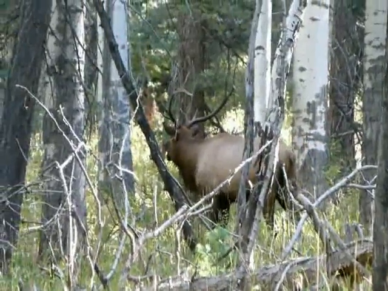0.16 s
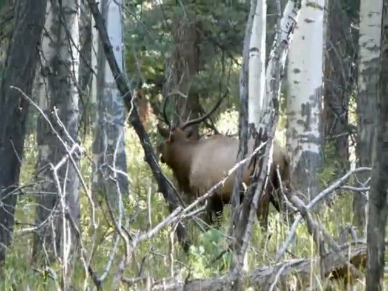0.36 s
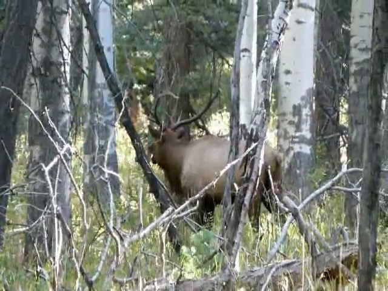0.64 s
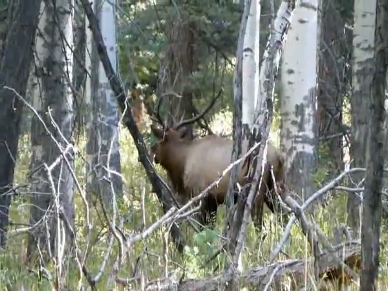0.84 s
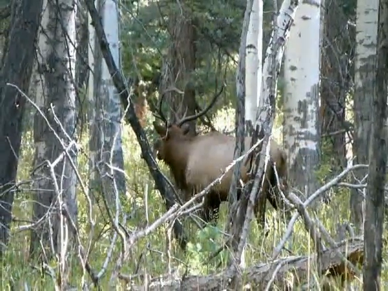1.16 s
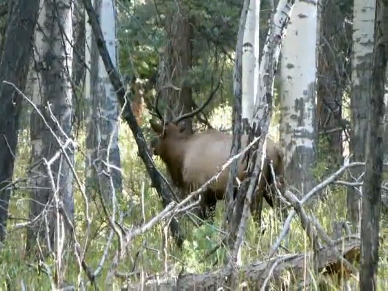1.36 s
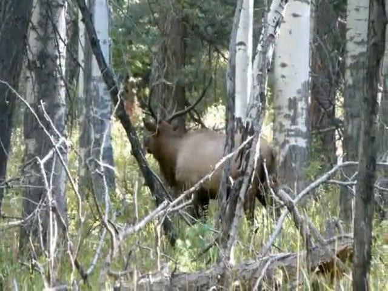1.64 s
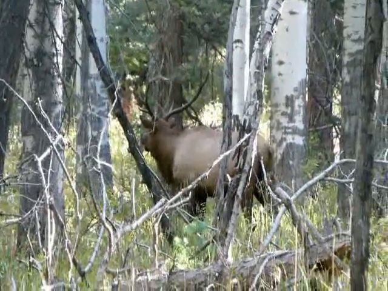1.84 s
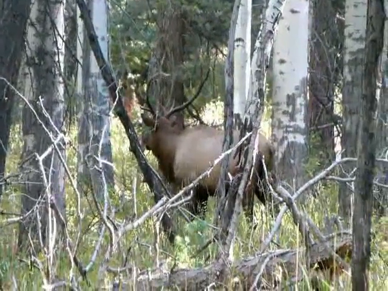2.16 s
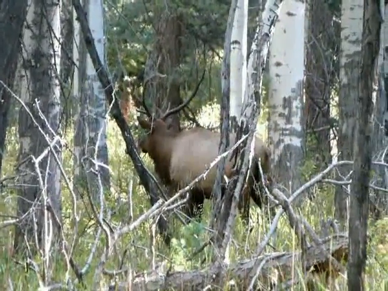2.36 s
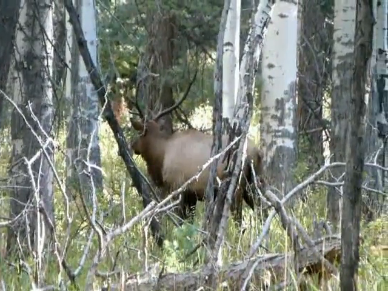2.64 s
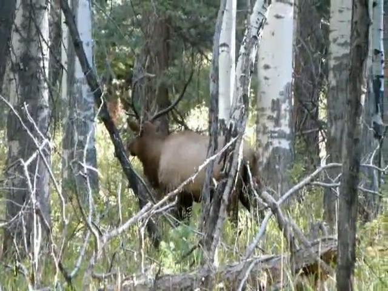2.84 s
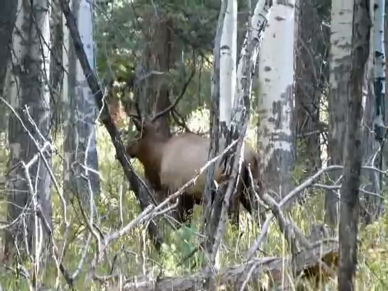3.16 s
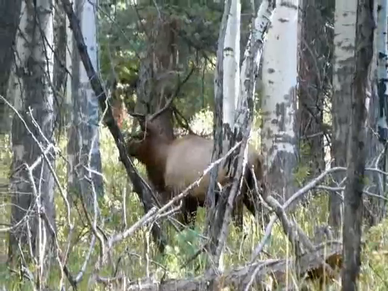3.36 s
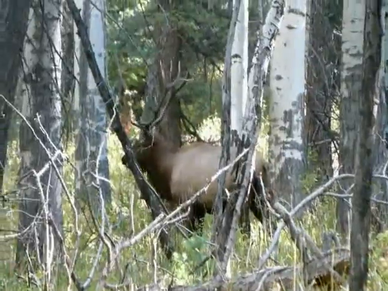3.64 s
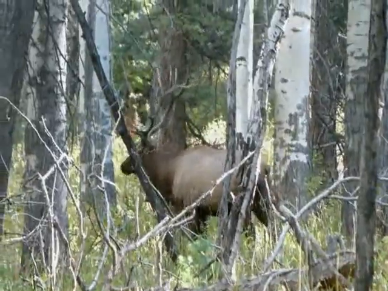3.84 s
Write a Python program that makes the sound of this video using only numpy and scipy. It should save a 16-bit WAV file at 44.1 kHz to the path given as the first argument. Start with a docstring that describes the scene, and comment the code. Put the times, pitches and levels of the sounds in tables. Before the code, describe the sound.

An elk's high, whistling bugle drops to a grunt and echoes, before two faint bird notes.

```python
"""A high whistle glides up in a forest: a bull elk bugling. It holds among rough, beating side tones,
then falls through the throat's resonances into a hoarse grunt of ragged pulses and breath.
The trees echo it for a second or more. A brief rustle and two nasal bird notes, perhaps a nuthatch,
follow over quiet air, a low hum and a faint burble with dull knocks."""
import sys
import numpy as np
from scipy import signal
from scipy.fft import rfft, irfft, next_fast_len
from scipy.io import wavfile
from scipy.ndimage import uniform_filter1d, map_coordinates

SR = 44100
rng = np.random.default_rng(int(sys.argv[2]) if len(sys.argv) > 2 else 0)


def put_to_file(sound):
    """Save the sound as 16-bit audio at rate SR, in the file named by the first command-line argument."""
    columns = np.atleast_2d(sound).T  # one column per channel
    safe = np.clip(columns, -1, 1)
    whole_steps = np.round(safe * 32767)
    wavfile.write(sys.argv[1], SR, whole_steps.astype(np.int16))


N = 176400

# Rise and hold of the main whistle: t/s, f/Hz
WHISTLE_GLIDE = [(0, 1835), (.12, 1918), (.29, 1992), (.345, 2059), (.69, 2073), (.76, 2090), (.85, 2080),
                 (1.17, 2072), (1.24, 2057), (1.3, 2071)]
# Swells of its fundamental, octave and third partial: t/s, level/dB
WHISTLE_SWELLS = [(0, -43.5), (.13, -43), (.27, -29.5), (.38, -29), (.46, -35), (.5, -26), (.57, -21.5),
                  (.635, -38.5), (.68, -24.5), (.735, -34), (.8, -26), (.87, -26), (.95, -41), (1.04, -24),
                  (1.11, -33), (1.15, -25.5), (1.215, -27.5), (1.255, -40), (1.28, -26.5), (1.37, -28.5),
                  (1.45, -44.5)]
OCTAVE_SWELLS = [(0, -64), (.27, -59), (.36, -49), (.47, -54), (.54, -38.5), (.59, -52), (.668, -39),
                 (.708, -52.5), (.75, -36.5), (.798, -55), (.862, -37), (.906, -59.5), (.946, -43),
                 (1.038, -39.5), (1.086, -56), (1.17, -39.5), (1.4, -61)]
THIRD_SWELLS = [(.3, -83), (.38, -69.5), (.64, -60.5), (.8, -67), (.87, -63), (1.0, -70.5), (1.19, -67.5),
                (1.32, -91.5)]

def whistle():
    """The lead: a clean, loud tone with two overtones, whose pitch tremble eases as it settles."""
    hz, = curves(WHISTLE_GLIDE)
    db, octave_db, third_db = curves(WHISTLE_SWELLS) + curves(OCTAVE_SWELLS) + curves(THIRD_SWELLS)
    settle_s = 0.42
    unsettled = np.clip(1 - np.arange(N) / SR / settle_s, 0, 1)
    phase = phase_of(hz, jitter=.001 + .011 * unsettled, rate=180)
    octave = amp(octave_db) * np.sin(2 * phase)
    third = amp(third_db + 3 * wobble(22)) * np.sin(3 * phase)
    fundamental = amp(db + 0.85 * wobble(86)) * np.sin(phase)
    return np.sqrt(2) * during(WHISTLE_SWELLS) * (fundamental + octave + third)


# Rougher whistle just above the lead: t/s, f/Hz, level/dB, octave level/dB
SHAKY_WHISTLE = [(0, 2247, -43.5, -78), (.28, 2203, -41, -60.5), (.5, 2193, -44.5, -69.5),
                 (.7, 2188, -45, -72), (.735, 2172, -41.5, -53.5), (.785, 2199, -32, -47.5),
                 (1.02, 2188, -43.5, -60.5), (1.12, 2192, -37, -49), (1.36, 2198, -36, -63),
                 (1.62, 2196, -48, -76)]

def second_whistle():
    """A shakier whistle that turns shrill twice at the height of the call."""
    hz, db, octave_db = curves(SHAKY_WHISTLE)
    phase = phase_of(hz, jitter=.004, rate=220)
    overtones = amp(octave_db) * (np.sin(2 * phase) + amp(-15) * np.sin(3 * phase))
    shimmer = amp(2 * wobble(60))
    return np.sqrt(2) * during(SHAKY_WHISTLE) * shimmer * (amp(db) * np.sin(phase) + overtones)


# Side tones above and below the lead: t/s, f/Hz, level/dB
JUST_ABOVE = [(.765, 2105, -43.5), (.79, 2151, -29), (.88, 2150, -28), (.96, 2133, -32),
              (1.15, 2118, -50.5)]
ABOVE = [(.07, 2420, -58.5), (.12, 2428, -35), (.19, 2425, -45.5), (.3, 2465, -35.5), (.38, 2430, -44),
         (.445, 2422, -30.5), (.485, 2440, -49.5), (.618, 2420, -36.5), (.65, 2425, -47),
         (.77, 2455, -45.5), (1.2, 2420, -46), (1.238, 2405, -39), (1.3, 2390, -53.5)]
FAR_ABOVE = [(.08, 2900, -63), (.16, 2893, -52.5), (.5, 2930, -63), (.85, 2914, -58), (1.2, 2850, -71)]
JUST_BELOW = [(0.278, 1993, -32.5), (.33, 1990, -31.5), (.6, 2030, -45.5), (1.25, 2004, -52)]
BELOW = [(0, 1778, -43), (.22, 1832, -44), (.5, 1854, -69)]
FAR_BELOW = [(.03, 1074, -62), (.4, 1075, -53), (.5, 1071, -58), (.8, 1069, -60.5)]
ONSET_TONE = [(0, 1528, -43), (.06, 1558, -43), (.15, 1554, -59.5), (.35, 1580, -57)]

def side_tones():
    """Rough tones around the whistle; the closest beat against it."""
    return (tone(JUST_ABOVE, jitter=.0047, rate=160, shimmer_db=6, partials=((1, 0), (2, -25)))
            + tone(ABOVE, jitter=.007, rate=220, shimmer_db=4)
            + tone(JUST_BELOW, jitter=.0088, rate=220, shimmer_db=3)
            + tone(BELOW, jitter=.025, rate=330, shimmer_db=3.5)
            + tone(ONSET_TONE, jitter=.012, rate=160, shimmer_db=0)
            + tone(FAR_BELOW, jitter=.0092, rate=160, shimmer_db=2)
            + tone(FAR_ABOVE, jitter=.0082, rate=300, shimmer_db=2))


# The tumbling whistle and the squeal on top: t/s, f/Hz, level/dB
FALL = [(1.25, 1758, -69), (1.28, 1720, -33), (1.32, 1700, -40), (1.35, 1570, -32), (1.378, 1531, -24.5),
        (1.385, 1200, -35), (1.4, 1115, -27.5), (1.415, 1075, -34), (1.44, 792, -56)]
THIN_SQUEAL = [(1.26, 3497, -64.5), (1.285, 3425, -55.5), (1.32, 3397, -48), (1.36, 3345, -60),
               (1.41, 3350, -68)]
# Partials of the fall: multiple of the pitch, level/dB
FALL_PARTIALS = [(1, -2), (2, -30.5)]

def whistle_break():
    """The whistle falls through the throat's resonances with a thin squeal."""
    fall = tone(FALL, jitter=.011, rate=300, shimmer_db=3.5, partials=FALL_PARTIALS)
    return fall + tone(THIN_SQUEAL, jitter=.009, rate=240, shimmer_db=3)


# Low voice sinking into the grunt: t/s, f/Hz, level/dB
VOICE_LINE = [(0, 168.4, -46.5), (.35, 179.8, -51.5), (.7, 170.9, -51.5), (1.02, 164.5, -51),
              (1.17, 159.3, -46), (1.36, 152.6, -46), (1.43, 140.3, -35), (1.54, 115.7, -35),
              (1.63, 105, -41), (1.8, 95, -56), (2.0, 89, -57)]
# Throat resonances: f/Hz, width/Hz, level/dB
FORMANTS = [(299, 122, -6.5), (656, 52, -3), (785, 54, 3), (1095, 78, 2), (1215, 150, -12.5),
            (1554, 122, -0.5), (1767, 60, -7.5), (2270, 105, -4)]
# Rasp envelopes: t/s, middle band level/dB, high band level/dB, onset band level/dB
RASP_SWELLS = [(0, -66, -69.5, -44.5), (.12, -57.5, -70.5, -51.5), (0.249, -56.5, -76.5, -69.5),
               (0.819, -54, -59, -76.5), (0.999, -57, -70.5, -76.5), (1.25, -56, -66, -72.5),
               (1.308, -50.5, -46, -61), (1.401, -62, -69.5, -80), (1.5, -87.5, -78, -95)]

def hoarse_voice():
    """Ragged low pulses and pulsing breath through the throat, with a rasp above."""
    hz, db = curves(VOICE_LINE)
    phase = phase_of(hz, jitter=.04, rate=120)
    pulses = unit(np.diff(np.floor(phase / (2 * np.pi)), prepend=0))  # one click a cycle
    breath = unit(rng.standard_normal(N) * (1 + 0.59 * np.cos(phase)))
    breath_share = 0.59
    source = np.sqrt(1 - breath_share) * pulses + np.sqrt(breath_share) * breath
    throat = lambda f: sum(amp(level) * resonance(f, centre, width) for centre, width, level in FORMANTS)
    hoarse = unit(filtered(source, throat))
    band = lambda centre_hz, width_hz: unit(filtered(breath, lambda f: resonance(f, centre_hz, width_hz)))
    middle_db, high_db, onset_db = curves(RASP_SWELLS)
    rasp = (amp(middle_db) * (band(2575, 270) + amp(-11.5) * band(4900, 940))
            + amp(high_db) * band(3390, 48)
            + amp(onset_db) * band(3660, 180))
    return amp(db) * hoarse * during(VOICE_LINE) + rasp * during(RASP_SWELLS)


# Low groan and the throat's ring: t/s, f/Hz, level/dB
GROAN_LINE = [(1.05, 164, -70), (1.14, 162.4, -60.5), (1.28, 159.4, -59), (1.42, 148.3, -51),
              (1.47, 130, -70)]
THROAT_RING = [(1.06, 690, -65), (1.13, 705, -52), (1.26, 728, -51), (1.29, 675, -52.5), (1.35, 660, -50),
               (1.5, 665, -56.5)]
# Partials of the groan: multiple of the pitch, level/dB
GROAN_PARTIALS = [(1, -9), (2, -5.5), (7, -3.5)]

def groan():
    """Body under the end of the whistle: a low groan while the throat rings and sinks."""
    low = tone(GROAN_LINE, jitter=.012, rate=150, shimmer_db=4.5, partials=GROAN_PARTIALS)
    return low + tone(THROAT_RING, jitter=.055, rate=260, shimmer_db=4)


# The whistle's far echo: t/s, f/Hz, level/dB
ECHO_LINE = [(1.38, 2070, -49), (1.47, 2070, -42), (1.6, 2071, -35.5), (1.71, 2066, -50), (2.02, 2060, -59),
             (2.1, 2068, -55.5), (2.22, 2068, -65), (2.6, 2070, -71)]

def far_echo():
    """A wavering tone that lingers at the whistle's held pitch and fades."""
    return tone(ECHO_LINE, jitter=.003, rate=97, shimmer_db=2.5)


# Bird notes: start t/s, length/s, level/dB, top f/Hz, brightness/(dB per octave)
BIRD_NOTES = [(3.428, .103, -49.5, 528.6, -1.5), (3.924, 0.11, -48, 522, 8)]
# Their nasal colour: f/Hz, level/dB
BIRD_EQ = [(500, -31), (1050, -8.5), (1570, -6), (2100, -4.5), (2620, 1), (3140, 0.5), (3670, -1),
           (4200, -15), (5200, -32.5), (8000, -48)]

def bird():
    """Short nasal notes, rich in harmonics and a little breathy, on an arched pitch."""
    droop, crest = .33, .38  # depth of the arch; place of its top along the note
    orders = np.arange(1, 12)
    out = np.zeros(N)
    for start, length, db, hz, tilt_db in BIRD_NOTES:
        t = np.arange(N) / SR - start
        pitch = hz * (1 - droop * (np.clip(t / length, 0, 1) - crest) ** 2)
        phase = phase_of(pitch, jitter=.004, rate=320)
        gains = amp(along(BIRD_EQ, hz * orders) + tilt_db * np.log2(orders))
        voiced = unit(sum(gain * np.sin(k * phase) for k, gain in zip(orders, gains)))
        breath = unit(filtered(rng.standard_normal(N), lambda f: amp(along(BIRD_EQ, f))))
        attack = np.clip(t / 0.029, 0, 1)
        release = np.clip((length - t) / 0.024, 0, 1)
        out += amp(db) * (voiced + amp(-15.5) * breath) * attack * release
    return out


# Reverb time among the trees: f/Hz, time to fall 60 dB/s
FOREST_DECAY = [(100, 1.1), (300, 5.5), (1000, 2.1), (2100, 1.8), (4000, 0.76), (9000, 0.43)]

def forest(x, direct_db, echo_db, decay_share=1):
    """The direct sound and its scatter from near and far trunks; the treble dies first."""
    hz, t, noise = signal.stft(rng.standard_normal((2, 2 * SR)), SR, nperseg=256)
    rise = 1 - np.exp(-t / 0.0046)
    far_trees = 1 + amp(-6) * np.exp(-((t - 0.26) / 0.03) ** 2)  # a late swell
    envelope = amp(-60 * t / (decay_share * along(FOREST_DECAY, hz)[:, None])) * rise * far_trees
    envelope /= np.linalg.norm(envelope, axis=1, keepdims=True)  # equal energy in every band
    tail = signal.istft(noise * envelope, SR, nperseg=256)[1]
    mid, side = signal.fftconvolve(x[None], tail / np.linalg.norm(tail[0]), axes=1)[:, :N]
    spread = np.arccos(0.38) / 2  # from the left-right likeness
    echo = np.cos(spread) * mid + np.sin(spread) * np.array([side, -side])
    return amp(direct_db) * x + amp(echo_db) * echo


# Rustle envelope: t/s, level/dB
RUSTLE_SWELL = [(2.93, -85), (2.945, -47.5), (2.975, -56.5), (2.995, -56), (3.012, -56), (3.04, -58),
                (3.12, -59), (3.3, -68.5)]
# Its colour: f/Hz, level/dB
RUSTLE_EQ = [(40, -7), (100, -1.5), (250, 7.5), (1000, 3.5), (2000, 2.5), (5000, -2), (8000, -19.5),
             (15000, -22)]

def rustle():
    """One brief, fluttering brush of noise."""
    db, = curves(RUSTLE_SWELL)
    return amp(db + 2.5 * wobble(150)) * during(RUSTLE_SWELL) * stereo_noise(RUSTLE_EQ)


# Knock hits: t/s, level before the trim/dB
KNOCK_HITS = [(2.289, -40), (2.395, -43), (2.495, -47), (2.578, -41), (2.784, -42.5), (3.243, -41.5),
              (3.273, -41), (3.769, -43.5)]
# Dull colour of burble and knocks: f/Hz, level/dB
BURBLE_EQ = [(150, -17.5), (450, -8), (950, -1.5), (1250, -7.5), (1700, -25), (5000, -58.5)]

def burble_and_knocks():
    """Faint, flickering midrange noise and short bursts of it, heard as distant knocks."""
    t = np.arange(N) / SR
    trim_db, attack_s, t60_s = -7.5, 0.0026, 0.12
    burble = amp(-59 + 3 * wobble(45)) * stereo_noise(BURBLE_EQ)
    hits = np.zeros(N)
    for at, db in KNOCK_HITS:
        attack = np.clip((t - at) / attack_s + 1, 0, 1)
        hits += attack * amp(db + trim_db - 60 * np.maximum(t - at, 0) / t60_s)
    return burble + hits * stereo_noise(BURBLE_EQ)


# Colour of the still air: f/Hz, level/dB
AIR_EQ = [(25, -20.5), (55, -6.5), (90, -2.5), (120, -9), (175, 1), (350, -2), (600, -3.5), (1000, -3),
          (1500, -4.5), (3000, -7), (6000, -10.5), (10000, -14), (14300, -20), (15500, -24)]

def air_and_hum():
    """The bed: a soft, steady hush and a low, wavering hum."""
    hum = amp(-71.5 + 1.5 * wobble(12)) * np.sqrt(2) * np.sin(phase_of(hz=84.4, jitter=.021, rate=16))
    return amp(-56.5) * stereo_noise(AIR_EQ) + hum


# Stereo image of the background noises: f/Hz, left-right likeness (0 to 1)
LIKENESS = [(25, .75), (70, 0.9), (300, 0.88), (1000, 0), (2500, 0), (8000, 0)]

def stereo_noise(eq):
    """Coloured noise of rms 1, centred in the bass and wide in the treble."""
    spread = lambda hz: np.arccos(along(LIKENESS, hz)) / 2
    response = lambda hz: amp(along(eq, hz)) * [np.cos(spread(hz)), np.sin(spread(hz))]
    mid, side = filtered(rng.standard_normal((2, N)), response)
    return unit(np.array([mid + side, mid - side]))


def tone(rows, jitter, rate, shimmer_db, partials=((1, 0),)):
    """An unsteady tone on a pitch and level curve."""
    hz, db = curves(rows)
    phase = phase_of(hz, jitter, rate)
    wave = sum(amp(level) * np.sin(k * phase) for k, level in partials)
    return np.sqrt(2) * during(rows) * amp(db + shimmer_db * wobble(59.93)) * wave


def phase_of(hz, jitter, rate):
    """Phase of an oscillator that trembles by the share jitter of its pitch."""
    return 2 * np.pi * np.cumsum(hz * (1 + jitter * wobble(rate))) / SR


def wobble(rate):
    """A smooth random curve, rate knots a second."""
    return map_coordinates(rng.standard_normal(int(N * rate / SR) + 4), [np.arange(N) * rate / SR])


def curves(rows):
    """One value per sample for each column after the time."""
    times, *columns = np.transpose(rows)
    return [np.interp(np.arange(N) / SR, times, column) for column in columns]


def during(rows):
    """A soft-edged gate, open while a curve lasts."""
    t = np.arange(N) / SR
    return uniform_filter1d(1. * ((t >= rows[0][0]) & (t <= rows[-1][0])), size=200)


def along(points, hz):
    """Read (f/Hz, value) points on a log axis."""
    f, values = np.transpose(points)
    return np.interp(np.log(hz + 1), np.log(f + 1), values)


def filtered(x, response):
    """x shaped by a gain that depends on frequency."""
    size = next_fast_len(N + SR // 2)
    return irfft(rfft(x, size) * response(np.fft.rfftfreq(size, 1 / SR)), size)[..., :N]


def resonance(f, hz, width):
    """A steep-sided peak at hz."""
    return np.abs(1j * f * width / (hz * hz - f * f + 1j * f * width)) ** 1.57


def amp(db):
    return 10 ** (np.asarray(db) / 20)


def unit(x):
    return x / np.sqrt(np.mean(x ** 2) + 1e-20)


def scene():
    """The elk stands slightly to the left; the bird is nearer and drier."""
    collapse = groan() + whistle_break()
    elk = (forest(whistle(), direct_db=0, echo_db=-15) + far_echo()
           + forest(second_whistle() + side_tones(), direct_db=-2.5, echo_db=-2.5)
           + forest(collapse, direct_db=-0.9, echo_db=-7)
           + forest(hoarse_voice(), direct_db=-4, echo_db=-2.5))
    pan_left = amp([[1.57], [-1.57]])
    near_bird = forest(bird(), direct_db=-0.5, echo_db=-3.5, decay_share=0.32)
    return elk * pan_left + near_bird + rustle() + burble_and_knocks() + air_and_hum()


def record(dry):
    """A brick-wall high cut on the mix."""
    return filtered(dry, lambda hz: hz < 15600)


dry = scene()
out = record(dry)
put_to_file(out)
```